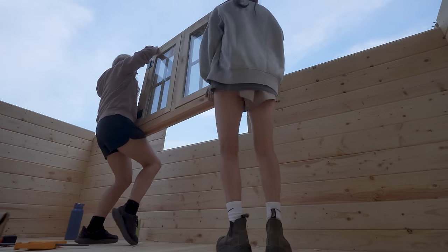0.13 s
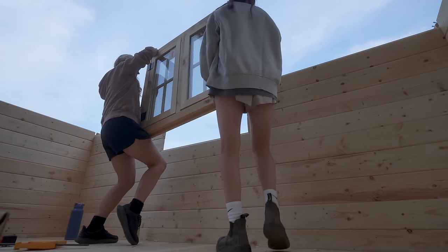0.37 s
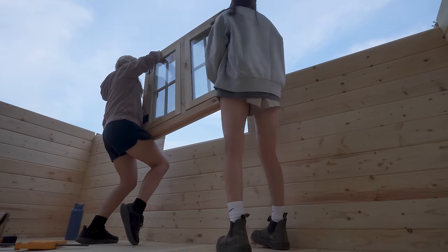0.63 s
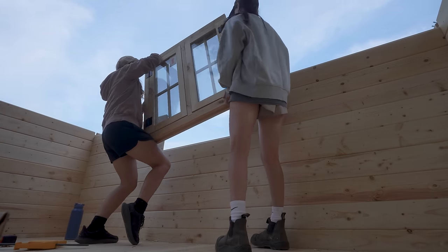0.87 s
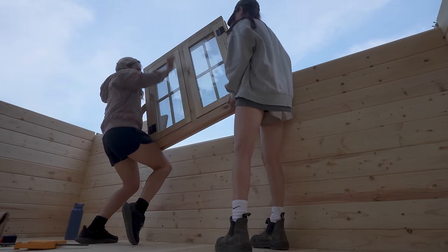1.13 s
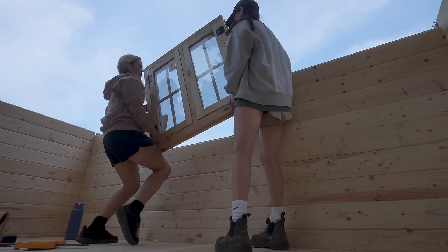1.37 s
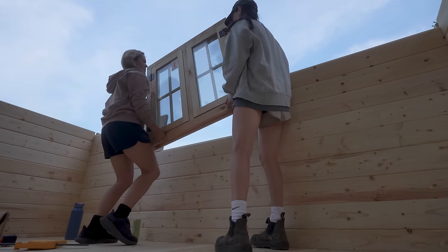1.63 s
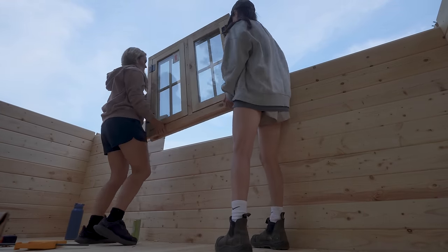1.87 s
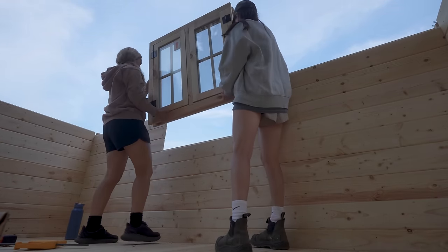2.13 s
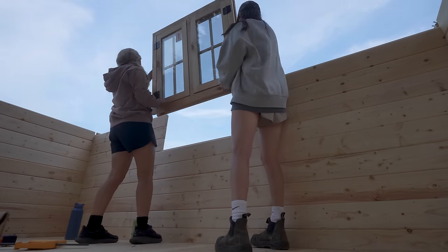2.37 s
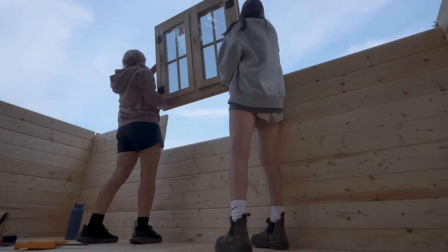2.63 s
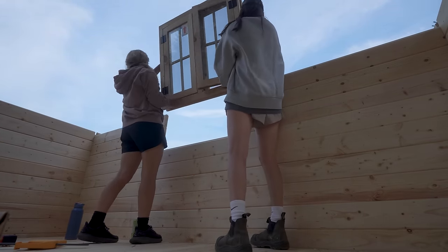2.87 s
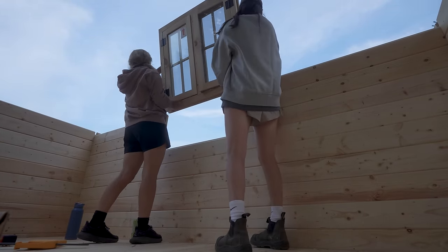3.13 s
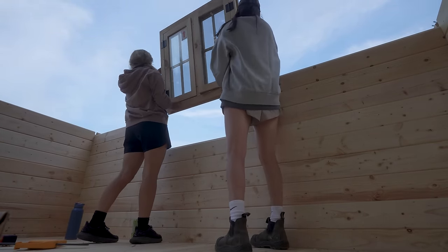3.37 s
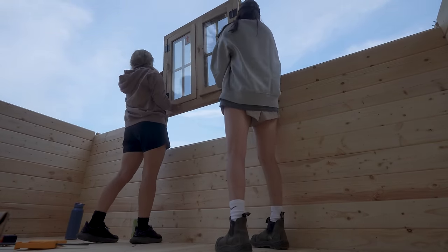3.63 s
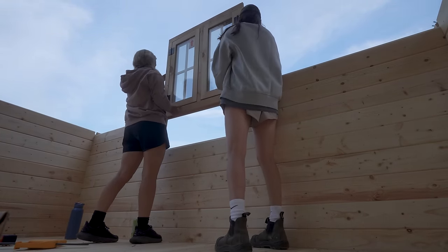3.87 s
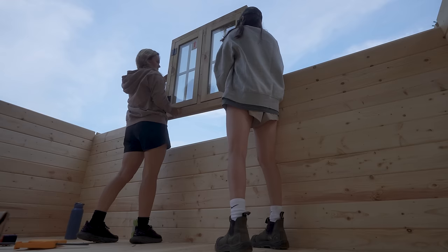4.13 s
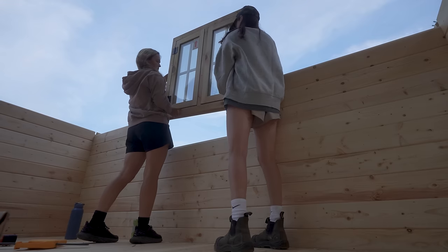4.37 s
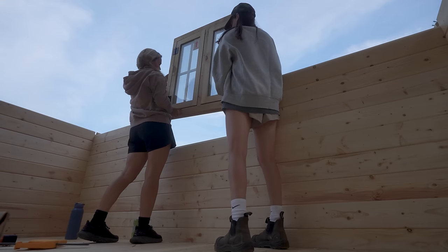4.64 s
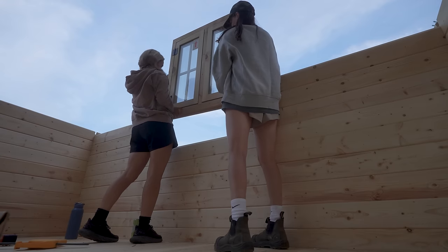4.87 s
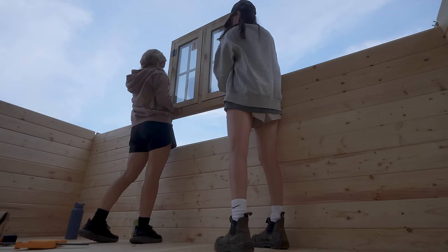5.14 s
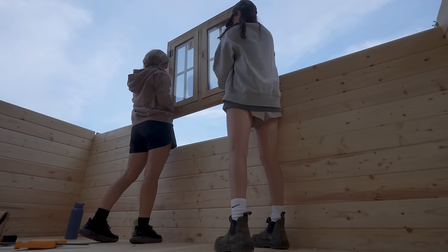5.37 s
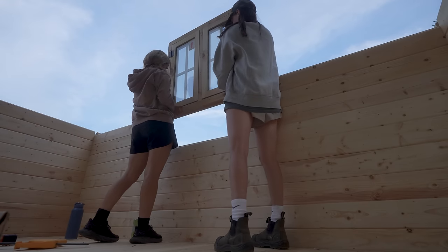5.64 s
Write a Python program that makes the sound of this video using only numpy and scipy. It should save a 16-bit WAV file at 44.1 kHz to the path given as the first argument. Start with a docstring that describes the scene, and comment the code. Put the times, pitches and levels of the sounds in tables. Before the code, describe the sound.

A heavy wooden window frame is manoeuvred into a gap in bare plank walls, heard close from the floor. A light bump at the start leads to firm thuds at about 0.2 s, then a deep, very strong double thump near 0.7 s with boots on boards. Gritty rubbing and faint thin squeaks follow around 0.9-1.3 s, and a loud sharp crack snaps at 1.4 s. Mostly ticks and light scrapes continue until a hard cluster of wooden knocks at 2.3-2.5 s, with a bright rub. A duller thud and click come at 2.9 s, then a short lull. From 3.45 s several bumps, drumming scrapes and a barely audible high squeak run to about 4.4 s. After a quieter moment, low thumps and a crisp crack arrive at 4.9 s, then soft knocks, ticks and rubbing at 5.2-5.6 s. Short wooden reflections and faint outdoor hush persist.

```python
"""Thuds of a heavy wooden frame and boots are heard first, with a gritty hiss of wood sliding on wood.
A glazed window frame is lifted into a gap in the plank walls of a roofless cabin, near a camera on the floor.
Thuds are rough pushes ringing decaying modes, ticks are crackles in one resonance, the hiss is shaped noise.
Faint squeaks are gliding bands of noise, and the bare walls answer knocks with short noise tails.
Slowly drifting outdoor air, again shaped noise, lies under it all."""
import sys
import numpy as np
from scipy import signal
from scipy.fft import rfft, irfft, next_fast_len
from scipy.io import wavfile
from scipy.ndimage import map_coordinates

SR = 44100
rng = np.random.default_rng(int(sys.argv[2]) if len(sys.argv) > 2 else 0)


def put_to_file(sound):
    """Save the sound as 16-bit audio at rate SR, in the file named by the first command-line argument."""
    columns = np.atleast_2d(sound).T  # one column per channel
    safe = np.clip(columns, -1, 1)
    whole_steps = np.round(safe * 32767)
    wavfile.write(sys.argv[1], SR, whole_steps.astype(np.int16))


def attenuation_scalar(level_db):
    """Turn a level in dB into a linear amplitude multiplier (20 dB per decade)."""
    decades = np.asarray(level_db, float) / 20
    return 10 ** decades


N = 253575  # length in samples

# Spectrum of the outdoor air, relative density: hz, level_db
AIR_SPECTRUM = [(15, -49), (25, 14.5), (293, -8.5), (384, -5.5), (1130, -12), (1330, -13.5), (16000, -34)]
AIR_DB = -44  # rms

# Reverberation time of the cabin: hz, t60_s
WALL_DECAY = [(300, 0.47), (2000, 0.29), (10000, 0.02)]

# Narrow bands sung by the rubbing edge: start_s, length_s, from_hz, to_hz, level_db
SQUEAKS = [(.87, .24, 2080, 2400, -41), (.84, .17, 2850, 3000, -46), (1.1, .22, 2900, 2750, -52),
           (3.57, .22, 5780, 5700, -53)]
SQUEAK_WIDTH_HZ = 350  # approximate; the band's random curves have this many knots a second

# Ticks of joints and grit: start_s, peak_db, ring_hz, crack_db (relative to the ring)
TICKS = [(0.5485, -20.5, 1480, 2), (0.5781, -20.5, 1430, -18), (0.717, -25, 1470, -23),
         (1.0195, -16.5, 2250, 4), (1.1812, -23.5, 3780, -23), (1.3274, -27, 3920, -18),
         (1.3858, -4, 4050, 7.5), (1.4465, -13, 3220, 10), (1.508, -28, 2860, 4.5),
         (1.6277, -22, 1390, 4.5), (1.6638, -18, 3750, 6), (1.7848, -11.5, 4530, 9),
         (1.9693, -24.5, 2330, 13), (2.1155, -27, 1740, -21), (2.173, -30, 1650, -13),
         (2.2677, -8.5, 2170, 12), (2.287, -26.5, 2600, -10), (2.405, -16, 3600, 4),
         (2.4392, -20.5, 3980, -17), (2.7801, -24, 3900, 14), (2.8921, -9, 1760, 5),
         (3.0033, -26.5, 3650, 3), (3.081, -31, 1480, -6), (3.3082, -23.5, 3620, 2),
         (3.4556, -26, 3000, -1), (3.869, -14.5, 4070, -22), (3.9193, -18, 3500, -21),
         (3.952, -21.5, 4800, -2), (4.029, -24.5, 3500, -15), (4.096, -30, 3400, -21),
         (4.232, -28.5, 3570, -18), (4.2437, -12.5, 1620, -8), (4.409, -11, 1560, -6),
         (4.5122, -32.5, 3400, -18), (4.6432, -29.5, 3470, -31), (4.748, -28, 1180, -7),
         (4.921, -11.5, 3670, 20), (4.994, -26, 3900, -8), (5.2138, -13, 2130, 13),
         (5.3145, -22.5, 1580, -22), (5.4173, -20, 3600, 6)]
TICK_CYCLES = 62  # cycles of its ring in which the crackle driving a tick falls by 60 dB

# Strokes of wood on wood: start_s, length_s, hiss_db, treble_db (relative to the hiss),
# drum_db (drumming of the planks)
STROKES = [(0, 0.0057, -40.5, -7, -18.5), (0.066, 0.065, -51, 1.5, -47),
           (0.168, 0.0099, -34.5, -0.5, -21.5), (0.234, 0.039, -47, 1, -34),
           (0.339, 0.065, -43.5, 0.5, -37), (0.551, 0.037, -34, -13.5, -39), (0.627, 0.23, -45.5, 2.5, -45),
           (.77, 0.069, -37.5, -4.5, -32), (0.88, 0.16, -38.5, 2, -61), (1.031, 0.067, -36.5, 0, -28),
           (1.151, 0.042, -43, -0.5, -33.5), (1.292, 0.041, -48, 5, -58), (1.391, 0.079, -50, 8.5, -62),
           (1.635, 0.066, -46.5, -2, -41), (1.797, 0.018, -46, -2, -52), (1.88, 0.0073, -54.5, 11, -58),
           (1.936, 0.29, -57, 6, -42.5), (2.307, 0.056, -39.5, 3.5, -30), (2.38, 0.061, -47.5, 3, -51),
           (2.478, 0.16, -39.5, 8, -31.5), (2.764, 0.14, -41, 6.5, -38), (2.917, 0.097, -48.5, 0, -52),
           (3.088, 0.17, -46, -1, -36.5), (3.467, 0.087, -40.5, -10, -41), (3.585, 0.29, -45.5, 3.5, -27),
           (3.786, 0.067, -41, 2.5, -21), (3.911, 0.04, -36.5, -3.5, -37), (4.02, 0.19, -43, -14, -33),
           (4.244, 0.17, -39, -5, -28.5), (4.51, 0.41, -59.5, -3, -40.5), (4.782, 0.11, -45.5, -11, -31),
           (4.905, 0.017, -37.5, -3, -19.5), (4.969, 0.076, -40.5, -5.5, -27), (5.23, 0.042, -53, 1, -35),
           (5.333, 0.15, -37, -6.5, -25.5), (5.594, 0.18, -44, -12, -30.5)]
RISE_DB_PER_S, FALL_DB_PER_S = 466, 209  # how fast a stroke starts and stops
DRUM_FALL_DB_PER_S = 128  # how fast a stroke leaves the planks
FIDGET_DB = -55  # hands and clothes never rest fully between strokes

# Spectra of the rubbing and of its treble, relative density: hz, level_db
HISS_SPECTRUM = [(290, 10.5), (500, 13.5), (769, 16.5), (1560, 13), (2560, 8.5), (3690, -9.5),
                 (7000, -16.5), (9100, -120)]
TREBLE_SPECTRUM = [(1800, -4.5), (3700, 5.5), (5000, -4), (5790, -7), (13000, -14), (16000, -20)]

# Echo of the hiss from the floor: time_s, delay_ms, share (amplitude relative to the direct sound)
FLOOR_ECHO = [(.7, .45, .15), (1, .42, .5), (1.25, .35, .5), (1.5, .5, .15), (2.4, .565, .65),
              (3.9, .56, .45), (4.3, .58, .5)]

# Drive of floorboards and walls by the rubbing as the frame settles in its gap: time_s, level_db
PLANK_LOAD = [(0, -1.5), (4.2, 4), (4.6, -4), (5.5, -14)]

# Modes of the woodwork, four groups from low to high: hz, level_db (relative), t60_s
BOARD_MODES = [(65.2, -9.5, 1), (94.8, -11, 0.56), (115.4, 5.5, 0.095)]
WALL_MODES = [(145.5, 1, 0.13), (158.2, -0.5, 0.18), (195.2, -7, 0.18)]
FRAME_MODES = [(245, 5.4, 0.045), (284.6, 0.62, 0.17)]
KNOCK_MODES = [(363, -7, 0.053), (430, 8.5, 0.013), (520, -8, 0.095), (587, -7.5, 0.035), (690, -9, 0.027),
               (863, -6.5, 0.032), (1150, -1, 0.0058), (1480, -12.5, 0.0096)]

# Thuds: start_s, level_db (peak of a group right at the landing place),
# place (0 floorboards, 1 wall, 2 frame), knock_db (relative), contact_s (time constant of the push)
THUDS = [(0.009, -22.5, 2.2, 3, 0.0073), (0.157, -11.5, 1.04, 5.5, 0.0081), (0.185, -6, 0.8, -10, 0.0061),
         (0.66, -7, 0, -15.5, 0.008), (0.686, -2.5, 0.96, -16, 0.0066), (1.018, -15.5, 0.42, -6, 0.021),
         (1.444, -42, 0.28, 23.5, 0.0053), (1.835, -20.5, 0, -28, 0.013), (1.881, -23.5, 0, -10, 0.018),
         (2.326, -3.5, 1.23, -9, 0.0049), (2.347, -4.5, 1, -46, 0.017), (2.416, -12, 0.67, -36, 0.014),
         (2.491, -6.5, 2.5, -30, 0.012), (2.884, -9, 0.8, -5, 0.026), (3.447, -13, 0.76, -2, 0.015),
         (3.477, -10, 0.15, -24, 0.017), (3.561, -10, 0.48, -16, 0.028), (3.785, -14, 2.5, -0.5, 0.016),
         (3.829, -13.5, 1.8, -2, 0.011), (3.949, -16.5, 0.17, -9.5, 0.021),
         (4.023, -9.5, 1.43, -11.5, 0.02), (4.246, -31.5, 0.22, 8.5, 0.017), (4.407, -32.5, 0, 15, 0.016),
         (4.889, -12, 0.4, -27, 0.031), (4.937, -8.5, 0, -24, 0.022), (5.229, -28.5, 0.77, 5, 0.0038),
         (5.329, -19, 1.2, -0.5, 0.047)]
PLACE_LOSS_DB = 6  # loss one place away from the landing; it grows with distance squared


def unit(x):
    """Normalization: scale to rms 1."""
    return x / np.sqrt(np.mean(x ** 2) + 1e-20)


def along(points, hz):
    """Interpolation of (hz, value) points on a logarithmic frequency axis."""
    point_hz, value = np.transpose(points)
    return np.interp(np.log(hz + 1), np.log(point_hz + 1), value)


def filtered(x, response):
    """Linear filtering: the spectrum of x is multiplied by a response of frequency."""
    size = next_fast_len(len(x) + SR // 2)
    spectrum = rfft(x, size) * response(np.fft.rfftfreq(size, 1 / SR))
    return irfft(spectrum, size)[:len(x)]


def wobble(rate):
    """Random modulation: a smooth curve through rate random knots a second."""
    knots = rng.standard_normal(int(N * rate / SR) + 4)
    return map_coordinates(knots, [np.arange(N) * rate / SR])


def ringing(modes, t, scatter_db, detune):
    """Modal superposition: decaying sines, each at a scattered strength and slightly shifted pitch."""
    hz, db, t60 = np.transpose(modes)[:, :, None]
    chance = rng.standard_normal((2, len(modes), 1))
    decay = attenuation_scalar(db + scatter_db * chance[0] - 60 * t / t60)
    return (decay * np.sin(2 * np.pi * hz * (1 + detune * chance[1]) * t)).sum(0)


def air():
    """Stationary broadband noise: a distant outdoor hush whose level drifts slowly."""
    hush = unit(filtered(rng.standard_normal(N), lambda hz: attenuation_scalar(along(AIR_SPECTRUM, hz))))
    return attenuation_scalar(AIR_DB) * attenuation_scalar(1.5 * wobble(2.76)) * hush


def walls(x):
    """Reverberation: plank walls return decaying noise, its highs dying first."""
    out, step = np.zeros(N + 2 * SR), SR // 4
    for start in range(0, N, step):  # every quarter second gets its own tail
        hz, t, noise = signal.stft(rng.standard_normal(SR // 2), SR, nperseg=256)
        decay = attenuation_scalar(-60 * t / along(WALL_DECAY, hz)[:, None])
        tail = signal.istft(noise * decay, SR, nperseg=256)[1]
        wet = signal.fftconvolve(x[start:start + step], tail / np.linalg.norm(tail))
        out[start + round(.008 * SR):][:len(wet)] += wet  # 8 ms on the way
    return out[:N]


def squeaks():
    """Narrow-band noise: random curves modulate a gliding carrier that fades in and out."""
    out, t = np.zeros(N), np.arange(N) / SR
    for start, length, from_hz, to_hz, db in SQUEAKS:
        progress = np.clip((t - start) / length, 0, 1)
        phase = 2 * np.pi * np.cumsum(from_hz + (to_hz - from_hz) * progress) / SR
        band = wobble(SQUEAK_WIDTH_HZ) * np.sin(phase) + wobble(SQUEAK_WIDTH_HZ) * np.cos(phase)
        fade = np.sqrt(np.abs(np.sin(np.pi * progress)))
        out += attenuation_scalar(db) * fade * band
    return out


def ticks():
    """Excited resonance: a dry crackle rings one small resonance, a hard contact adds a broad crack."""
    out, t = np.zeros(N + SR), np.arange(SR // 10) / SR
    width = .36  # resonance width as a fraction of its pitch
    broad = signal.butter(2, [1200, 5500], "bandpass", fs=SR)
    for start, db, ring_hz, crack_db in TICKS:
        def resonance(f):
            loss = 1j * f * width * ring_hz
            return (loss / (ring_hz ** 2 - f ** 2 + loss)) ** 2

        crackle = rng.standard_normal(len(t)) * attenuation_scalar(-60 * t * ring_hz / TICK_CYCLES)
        ring = filtered(crackle, resonance)
        # an impulse with a rough tail of about 2 ms
        contact = (t == 0) + 0.26 * crackle * attenuation_scalar(-60 * t / 0.0021)
        crack = signal.lfilter(*broad, contact)
        snap = ring / np.abs(ring).max() + attenuation_scalar(crack_db) * crack / np.abs(crack).max()
        out[round(start * SR):][:len(t)] += attenuation_scalar(db) * snap / np.abs(snap).max()
    return out[:N]


def stroking(level_db, fall_db_per_s):
    """Power addition: each stroke swells, holds and fades; overlapping ones add in power."""
    t = np.arange(0, N + 64, 64) / SR
    start, length = np.transpose(STROKES)[:2, :, None]
    rise_db = RISE_DB_PER_S * np.maximum(start - t, 0)
    fall_db = fall_db_per_s * np.maximum(t - start - length, 0)
    power = (attenuation_scalar(level_db[:, None] - (rise_db + fall_db)) ** 2).sum(0)
    return np.interp(np.arange(N) / SR, t, np.sqrt(power))


def grit(rate, share):
    """Stick-slip friction: dense noise is roughened by grains catching at random, rate a second."""
    catches = (rng.random(N) < rate / SR) * rng.random(N)
    grains = signal.lfilter([1], [1, -np.exp(-1 / (.002 * SR))], catches)  # 2 ms decay
    return unit(rng.standard_normal(N) * (1 + share * grains) * attenuation_scalar(1.52 * wobble(30)))


def hissing():
    """Comb filtering: friction noise meets its floor echo a fraction of a ms late."""
    hiss_db, treble_db = np.transpose(STROKES)[2:4]
    echo_s, *columns = np.transpose(FLOOR_ECHO)
    lag_ms, share = (np.interp(np.arange(N) / SR, echo_s, column) for column in columns)
    direct = grit(rate=250, share=1.2)
    lag = lag_ms * (1 + .015 * wobble(6)) * SR / 1000  # samples
    echo = map_coordinates(direct, [np.arange(N) - lag], order=3)
    echo = signal.lfilter(*signal.butter(1, 8000, fs=SR), echo)  # the boards return the treble weakly
    combed = (direct + share * echo) / np.hypot(1, share)
    hiss = unit(filtered(combed, lambda hz: attenuation_scalar(along(HISS_SPECTRUM, hz))))
    treble = unit(filtered(combed, lambda hz: attenuation_scalar(along(TREBLE_SPECTRUM, hz))))
    hiss_gain = np.hypot(stroking(hiss_db, FALL_DB_PER_S), attenuation_scalar(FIDGET_DB))
    return hiss_gain * hiss + stroking(hiss_db + treble_db, FALL_DB_PER_S) * treble


def drumming():
    """Forced vibration: the rubbing keeps the modes of the woodwork ringing softly."""
    t = np.arange(SR // 2) / SR
    rub = grit(rate=170, share=0.12)
    load = attenuation_scalar(np.interp(np.arange(N) / SR, *np.transpose(PLANK_LOAD)))
    frame = ringing(FRAME_MODES, t, 0, 0) + attenuation_scalar(5.0) * ringing(KNOCK_MODES, t, 0, 0)
    planks = ringing(BOARD_MODES + WALL_MODES, t, 0, 0)
    drum = unit(signal.fftconvolve(load * rub, planks) + signal.fftconvolve(rub, frame))[:N]
    return stroking(np.transpose(STROKES)[4], DRUM_FALL_DB_PER_S) * drum


def slide():
    """Friction radiates twice: directly as hiss, and through the woodwork as drumming."""
    return hissing() + drumming()


def thuds():
    """Impact excitation: a rough push of some ms rings the woodwork, most where it lands."""
    out, t = np.zeros(N + SR), np.arange(SR // 2) / SR
    for start, db, place, knock_db, contact in THUDS:
        u = t[:SR // 8] / max(contact, .002)
        push = np.sqrt(u) * np.exp(-u) * rng.standard_normal(len(u))
        share_db = list(-PLACE_LOSS_DB * (np.arange(3) - place) ** 2) + [knock_db]
        for modes, rel_db in zip((BOARD_MODES, WALL_MODES, FRAME_MODES, KNOCK_MODES), share_db):
            ring = signal.fftconvolve(push, ringing(modes, t, scatter_db=2.5, detune=0.012))
            out[round(start * SR):][:len(ring)] += attenuation_scalar(db + rel_db) * ring / np.abs(ring).max()
    return out[:N]


def scene():
    """Superposition: all sources and the walls' answer add at one microphone."""
    snaps, blows = ticks(), thuds()
    answer = walls(attenuation_scalar(-18.0) * snaps + attenuation_scalar(-13.5) * blows)
    return (blows + snaps + slide() + squeaks() + answer + air())[None]


def top_cut(x):
    """Nothing passes above the cut-off."""
    return signal.sosfilt(signal.butter(12, 16810, fs=SR, output="sos"), x)


def record(dry):
    """High-pass and saturation: the microphone loses deep bass, the camera rounds off the loudest peaks."""
    heard = signal.sosfilt(signal.butter(5, 67, "highpass", fs=SR, output="sos"), dry)
    rounded = heard / (1 + np.abs(heard) ** 6) ** (1 / 6)  # stays below full scale
    return top_cut(rounded)


dry = scene()
out = record(dry)
put_to_file(out)
```